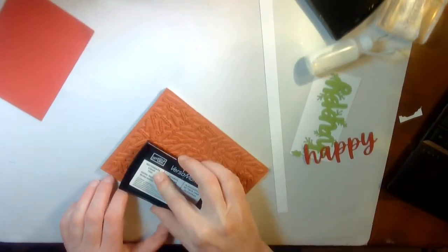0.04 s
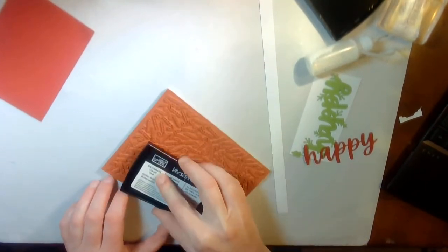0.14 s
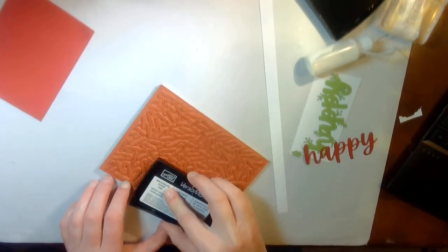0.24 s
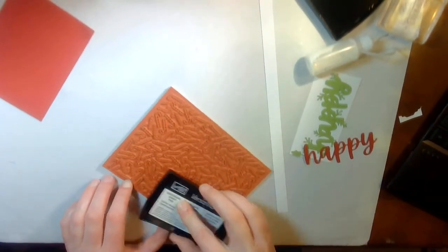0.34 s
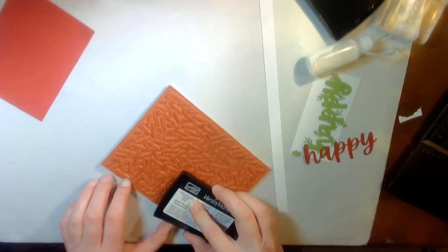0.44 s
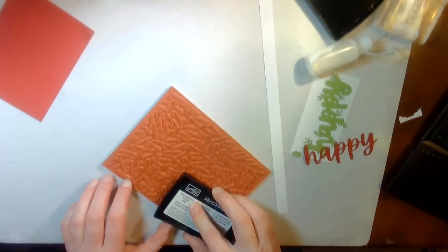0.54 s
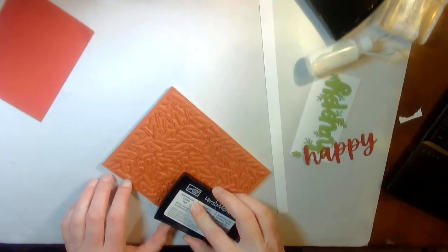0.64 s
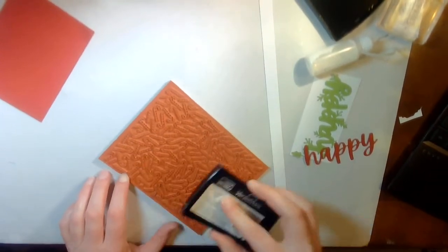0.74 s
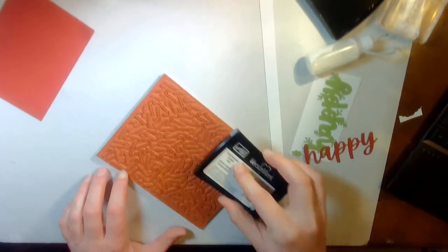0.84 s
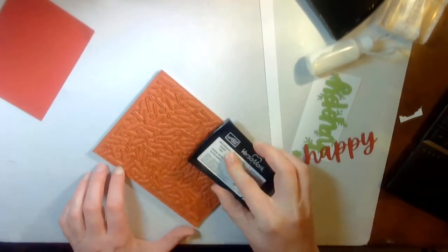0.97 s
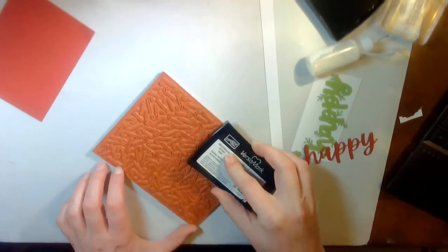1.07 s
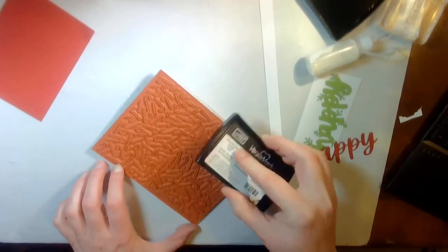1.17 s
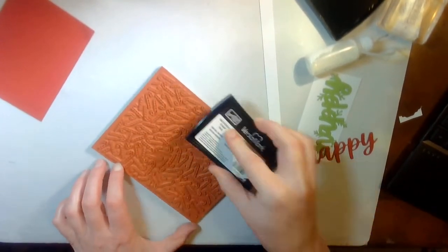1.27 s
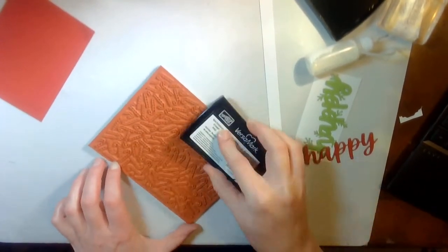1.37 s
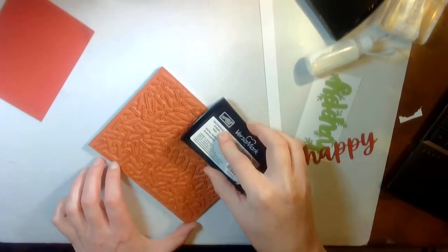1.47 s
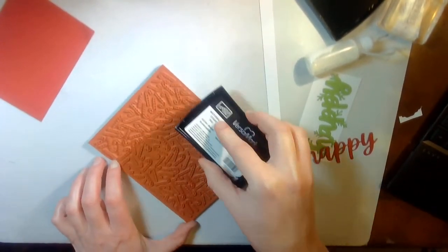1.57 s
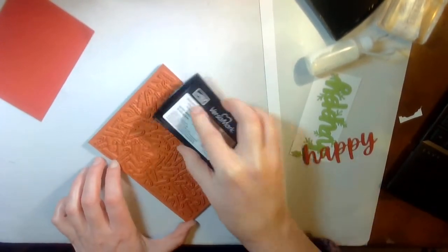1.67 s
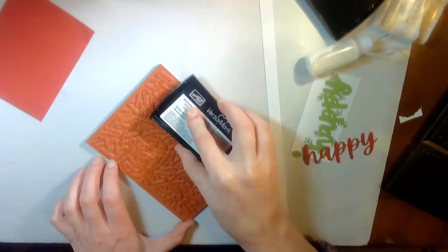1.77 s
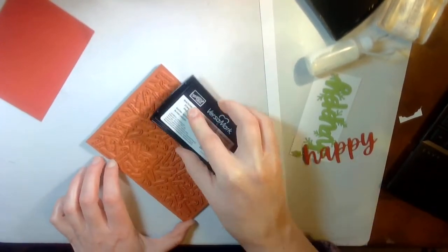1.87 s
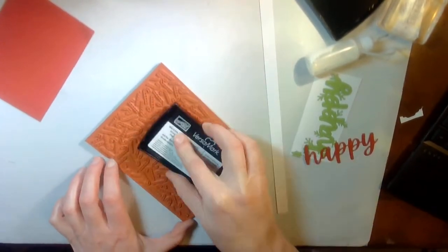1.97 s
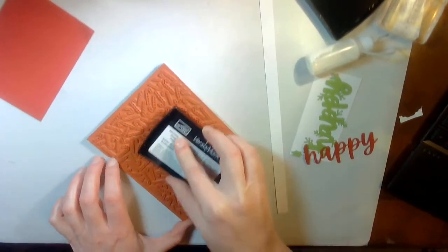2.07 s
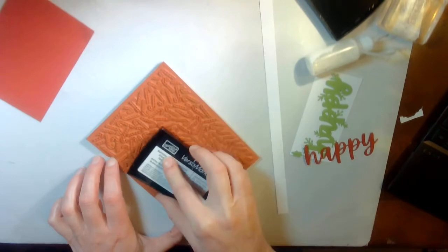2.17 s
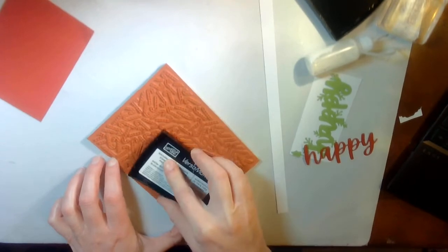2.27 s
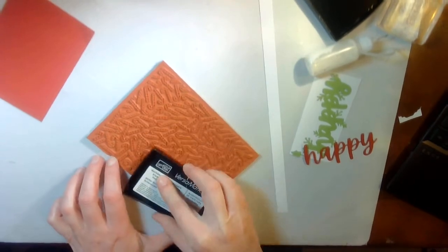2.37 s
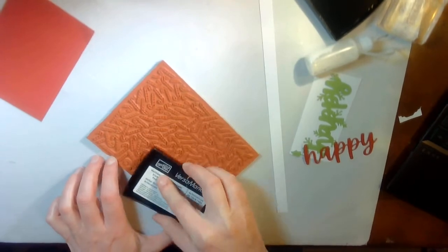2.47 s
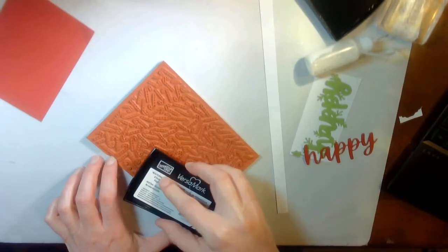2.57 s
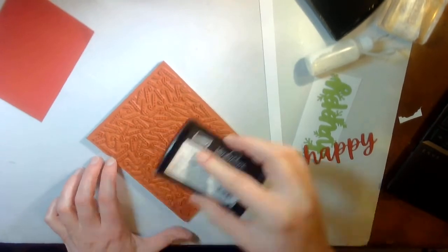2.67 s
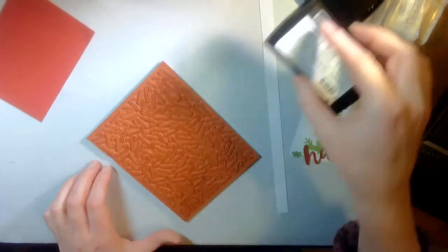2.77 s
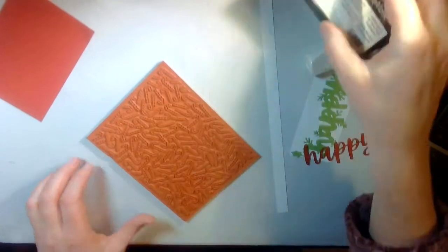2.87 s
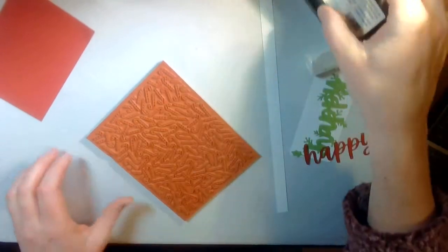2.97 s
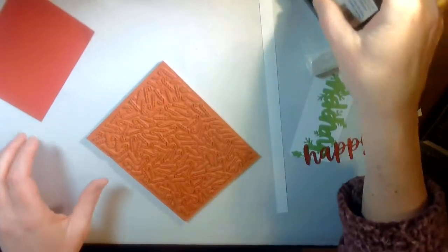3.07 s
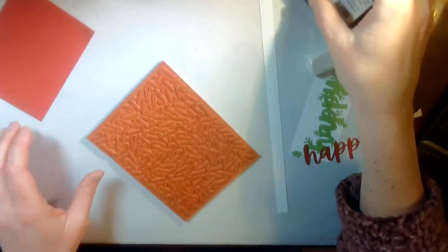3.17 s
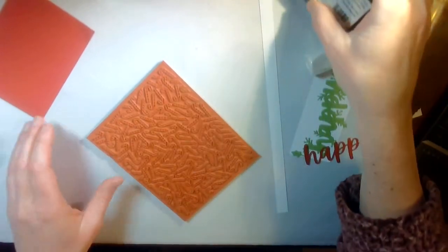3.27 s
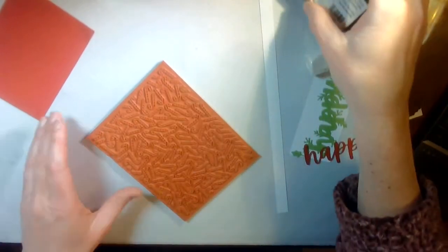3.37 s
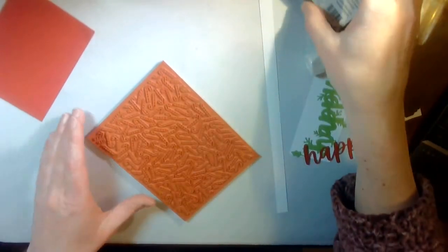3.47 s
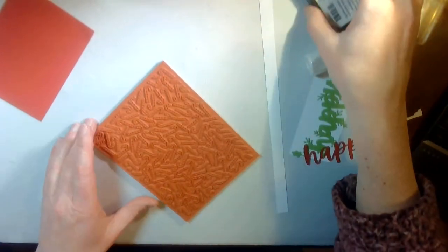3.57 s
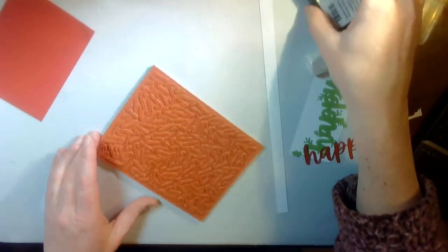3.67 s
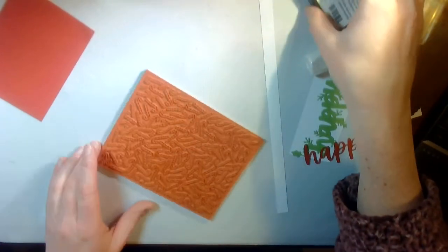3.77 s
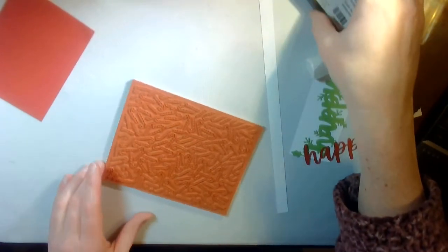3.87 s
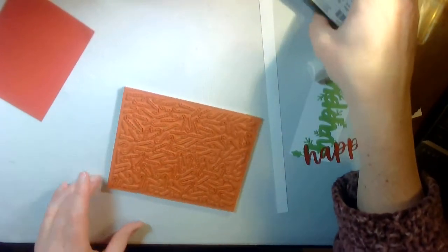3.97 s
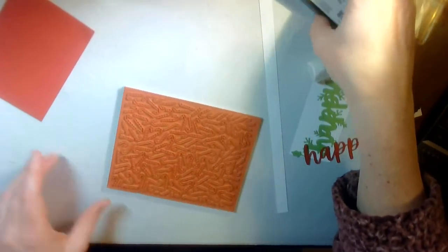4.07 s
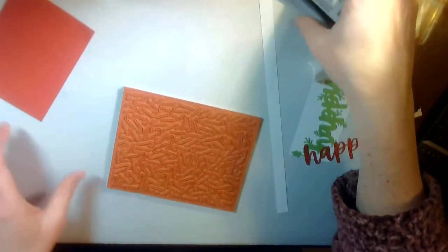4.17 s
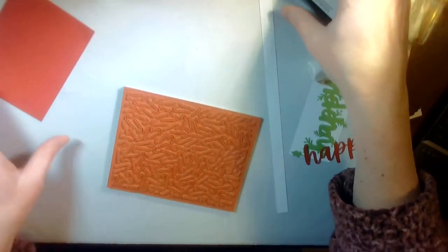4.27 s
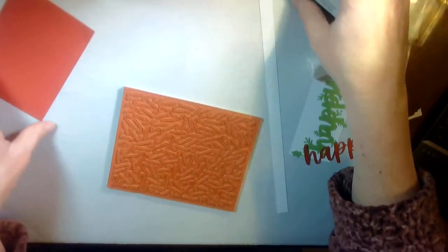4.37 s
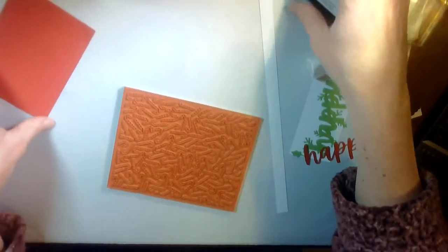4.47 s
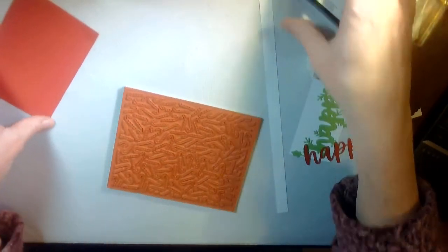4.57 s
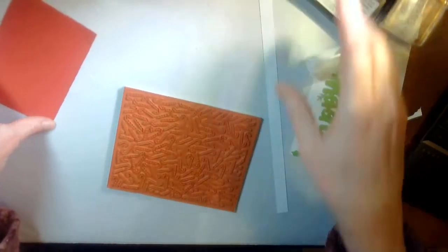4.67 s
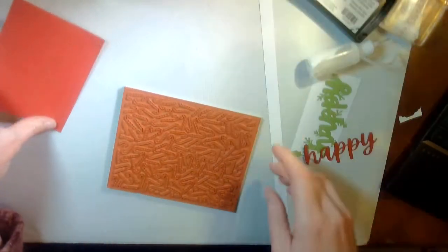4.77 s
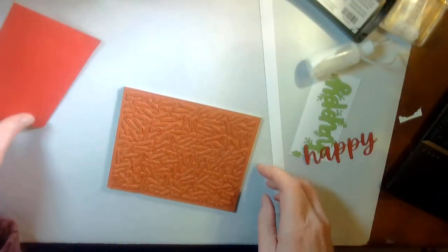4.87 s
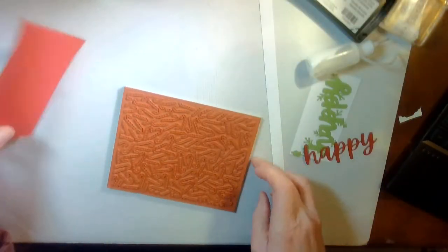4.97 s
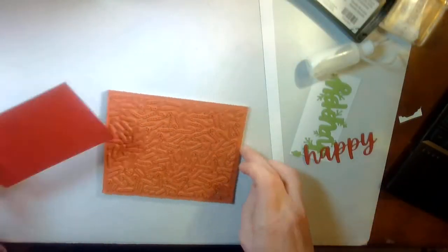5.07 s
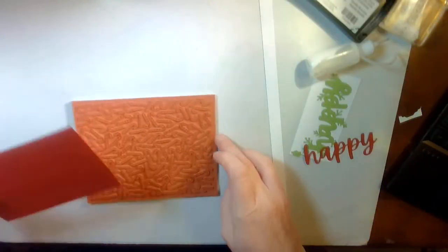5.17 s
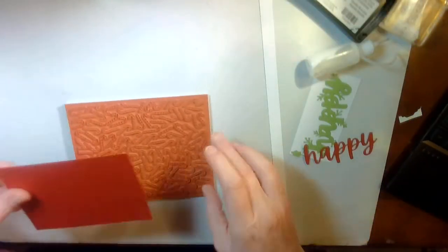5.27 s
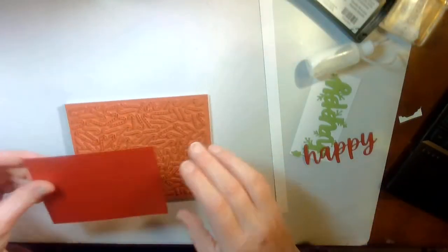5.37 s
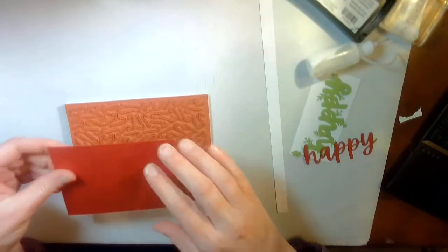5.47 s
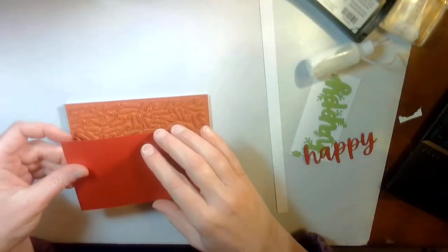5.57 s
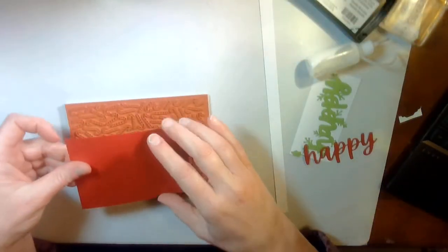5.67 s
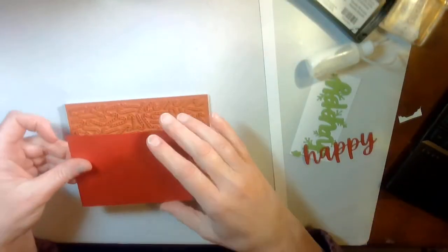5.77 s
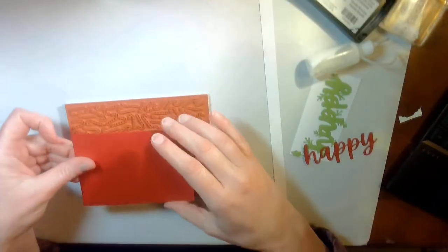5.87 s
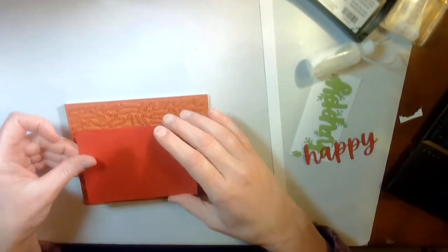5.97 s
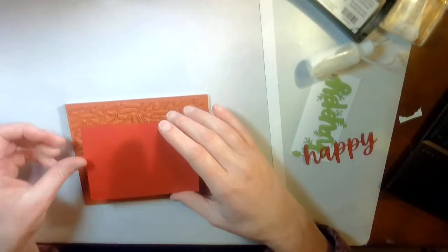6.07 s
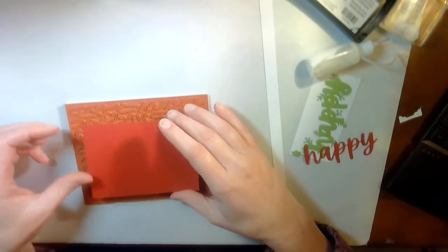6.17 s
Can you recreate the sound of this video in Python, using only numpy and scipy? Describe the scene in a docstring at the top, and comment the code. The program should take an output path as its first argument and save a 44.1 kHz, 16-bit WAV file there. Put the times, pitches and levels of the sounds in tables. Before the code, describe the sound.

A quiet small room with soft low room noise and very faint hum, heard from a microphone standing on the desk. From 0 to 2.5 seconds a plastic ink pad dabs a rubber stamp nine times, at about 0.0, 0.25, 0.45, 0.9, 1.3, 1.7, 2.0, 2.2 and 2.35. Each is a faint brush, a small click and a dull boomy thump, then a soft tacky peel; the last four are lighter. A muffled extra dab shakes at 1.2. Light sliding begins near 2.7. At 3.1 a dull knock, then a loud bright plastic clatter at 3.35 to 3.55, and a hard snap at 4.3. From 4.7 to 5.1 come dry scrapes and small ticks as the stamp is turned. At 5.55 and 5.75 a card brushes down with soft taps, sliding gently until the end.

```python
"""Over room noise and faint tones, an ink pad dabs a rubber stamp on a desk nine times: brush, click, thump, peel.
The pad then clatters down and its lid snaps shut; last, the stamp is turned and a card is slid onto it.
Pulses ring decaying modes of desk and microphone stand, noise bursts those of the plastic case;
grainy noise makes the brushes, peels, scrapes, slides and the dull shake of a light extra dab.
A small room and a microphone on the desk colour it."""
import sys
import numpy as np
from scipy import signal
from scipy.fft import rfft, irfft
from scipy.io import wavfile

SR = 44100
rng = np.random.default_rng(int(sys.argv[2]) if len(sys.argv) > 2 else 0)


def master(y):
    """Save y as 16-bit WAV."""
    cut = np.clip(np.atleast_2d(y).T, -1, 1)
    pcm = np.round(cut * 32767)  # scale
    wavfile.write(sys.argv[1], SR, pcm.astype(np.int16))


N = 274743
TIME = np.arange(N) / SR

# All db columns are relative levels, except in HUM_TONES.
# background noise spectrum: pitch_hz, density_db
FLOOR_SPECTRUM = [(13, 1.5), (22, -10.5), (64, 1.5), (83, -11.5), (152, -12), (194, -13.5), (236, -16),
                  (270, -20.5), (337, -19.5), (554, -23.5), (1970, -29), (2980, -32), (4630, -27.5),
                  (5310, -32.5), (16000, -35)]
# mains hum, fan and electronics: pitch_hz, rms_db
HUM_TONES = [(59.5, -57), (145.3, -67), (236.9, -70.5), (15482, -76)]
# hands and stamp sliding over the desk: time_s, friction_db
SLIDE_LEVELS = [(2.6, -73), (2.69, -57), (2.93, -68.5), (3.39, -83), (3.54, -58), (3.78, -56), (4.1, -65.5),
                (4.73, -63), (4.89, -53.5), (5.07, -52.5), (5.22, -57), (5.51, -93.5), (5.68, -56),
                (5.8, -87), (6.02, -55), (6.23, -57.5)]
# first row: dull shake of a light extra dab; others: fingers and card brushing pad, stamp and desk:
# middle_s, sigma_s, level_db, centre_hz, width_octaves
GRAINY_STROKES = [(1.231, 0.0061, -38, 500, 0.56), (3.14, 0.011, -48.5, 565, 4),
                  (4.294, 0.017, -49.5, 4000, 1), (4.488, 0.016, -55, 3830, 0.65),
                  (4.714, 0.016, -45.5, 5350, 2.1), (4.808, 0.014, -40.5, 3220, 0.69),
                  (4.833, 0.03, -45.5, 6200, 3.9), (4.88, 0.0092, -39, 186, 1.9),
                  (4.937, 0.014, -39.5, 600, 3.6), (4.976, 0.0058, -28.5, 680, 1.54),
                  (5.572, 0.037, -55, 4700, 0.48), (5.633, 0.025, -49, 1680, 1.2),
                  (5.767, .024, -41.5, 2010, 3.05)]
# pad rocks, clatters down, snaps shut; stamp is nudged: start_s, level_db, chatter_ms, hardness_hz, spot_hz
KNOCK_CONTACTS = [(0.4861, -9.5, 2.3, 4540, 1760), (0.7305, -35.5, 1.2, 7000, 4000),
                  (.803, -35, 0.65, 7000, 4830), (0.9411, -18, 1, 3580, 1350),
                  (1.221, -19, 6.3, 1700, 1010), (3.127, -5.5, 2.5, 300, 201),
                  (3.3582, -3, 4.9, 7635, 4450), (3.4037, 5.5, 1.6, 11100, 1970),
                  (3.406, 5.5, 3.8, 9100, 2960), (3.4825, -4, 3.6, 4150, 2700),
                  (3.527, -7, 4.4, 4650, 1070), (3.85, -27.5, 2.6, 2400, 875),
                  (4.105, -14, 1.44, 5400, 4500), (4.288, -22, 2.6, 4470, 1990),
                  (4.309, -20, 6.4, 4800, 2600), (4.3148, 8, 1.57, 1236, 696),
                  (4.317, 8.5, 7.9, 8500, 4360), (4.475, -37.5, 3.4, 4000, 1800),
                  (4.86, -23, 0.86, 5950, 3980), (4.9113, -12.5, 3.4, 7200, 1600),
                  (5.5435, -25.5, 6.8, 3060, 1010), (5.747, -18, 7.9, 1800, 1430)]
# pad on stamp: start_s, force_db, stand_shake_db, stand_shake_hz, lift_after_s, peel_db
DAB_CONTACTS = [(.0098, -8, 3, 510, .14, -52.5), (0.2381, -11, -3, 454, .078, -54),
                (0.4542, -2.5, 3, 387, 0.23, -48), (.908, -8, 0, 580, 0.19, -51.5),
                (1.3191, -2, -0.5, 290, 0.19, -52), (1.7038, -17.5, -10.5, 393, .186, -58),
                (1.978, -19, -2, 446, .132, -58.5), (2.1692, -24, -9, 423, 0.12, -57),
                (2.3557, -18.5, -2.5, 440, 0.18, -52.5)]
# desk top modes: pitch_hz, level_db, t60_s
DESK_MODES = [(38.8, -24.5, 0.59), (49.14, -20, 0.3), (56.8, -42.5, 0.87), (101, -20.5, 0.16),
              (118, -30.5, 0.4), (146.3, -31, 0.36), (195, -58, 0.47), (211.3, -34.5, 0.43),
              (293, -47.5, 0.12)]
# microphone stand modes, shaken through the desk: pitch_hz, level_db, t60_s
STAND_MODES = [(137, -30.5, 0.068), (216, -25, 0.038), (268.7, -30, 0.12), (301, -35.5, 0.097),
               (360.6, -22.5, 0.05), (449, -43, 0.11), (483, -26, 0.062), (537, -54, 0.074),
               (675, -37, 0.0664), (1006, -14.5, 0.014), (1192, -10.5, 0.028)]
# ink pad case modes: pitch_hz, level_db, t60_s
CASE_MODES = [(577, -38.5, 0.023), (746, -39.5, 0.075), (1057, -43, 0.014), (1360, -32.5, 0.021),
              (1640, -33.5, 0.032), (2024, -18.5, 0.0043), (2470, -29.5, 0.037), (2830, -28, 0.013),
              (3390, -37.5, 0.024), (3800, -27, 0.011), (4303, -25.5, 0.0092), (4663, -27, 0.015),
              (5080, -22, 0.0073), (5560, -28.5, 0.015), (6040, -27, 0.0089), (6950, -32.5, 0.016),
              (8400, -82, 0.00354), (12900, -27, .004)]
# room tail: pitch_hz, level_db, t60_s
ROOM_TAIL = [(100, -17.5, 1), (286, -4.5, 0.17), (664, -5.5, 0.19), (1500, -15, 0.29), (3000, -19.5, 0.28),
             (4950, -19, 0.28), (7960, -19, 0.4), (15500, -35, 0.073)]

FLOOR_RMS_DB = -53
SLIDE_DB, SLIDE_LOW_HZ, SLIDE_HIGH_HZ = -2, 3180, 5830
# felt brushes the rubber just before landing
BRUSH_LEAD_S, BRUSH_SIGMA_S, BRUSH_DB, BRUSH_LOW_HZ, BRUSH_HIGH_HZ = .002, 0.0049, -54.5, 1240, 5870
# tacky ink lets go: louder peels reach lower; PEEL_LOW_HZ holds at PEEL_REF_DB
PEEL_SIGMA_S, PEEL_REF_DB, PEEL_LOW_HZ, PEEL_DB_PER_OCTAVE, PEEL_HIGH_HZ = 0.023, -52.5, 2280, 19, 5940
# faint finger ticks; levels spread downward from TICK_MAX_DB
TICKS_PER_S, TICK_MAX_DB, TICK_SPREAD_DB = 0.94, -41, 6
TICK_CHATTER_MS, TICK_HARDNESS_HZ, TICK_SPOT_HZ = 1.0, 6500, 4300
# faint ring after the third dab
TING_S, TING_HZ, TING_DB, TING_T60_S = .487, 3320, -55.5, .4
TOUCH_SPREAD_DB = 1.5
KNOCK_LOW_SHARE = 0.62  # high-pass corner of a knock / its spot pitch
DAB_CHATTER_SHARE, DAB_HARDNESS_HZ = .8, 4630  # chatter length / push length
# firmer dabs push harder and shorter; PUSH_DB and PUSH_MS hold at 0 dB force
PUSH_DB, PUSH_DB_PER_FORCE_DB, PUSH_MS, PUSH_HALVING_DB = -1, 0.37, 2.9, 23.5
STAND_LAG_S = .011
CUTOFF_HZ = 16100


def from_db(db):
    """Decibels to gain."""
    return 10 ** (np.asarray(db) / 20)


def rms_one(x):
    """Scale to rms 1."""
    return x / np.sqrt(np.mean(x ** 2) + 1e-20)


def at_hz(rows, hz, axis=1):
    """Read one table column on a log-frequency axis."""
    rows = np.array(rows)
    return np.interp(np.log(np.maximum(hz, 1)), np.log(rows[:, 0]), rows[:, axis])


def cut(x, hz, kind, order=2):
    """Butterworth low-, high- or band-pass."""
    corner_hz = np.clip(hz, 10, .45 * SR)
    return signal.sosfilt(signal.butter(order, corner_hz, kind, fs=SR, output="sos"), x)


def resonate(x, hz, q):
    """Band-pass of gain 1 at its centre."""
    return signal.lfilter(*signal.iirpeak(hz, q, fs=SR), x)


def add(track, s, sound):
    """Mix a sound into a track from time s on."""
    start = int(np.clip(round(s * SR), 0, N - 1))
    track[start:start + len(sound)] += sound[:N - start]


def background(wander_rad=0.054):
    """Steady shaped noise plus faint tones with slightly wavering phase."""
    spectrum = from_db(at_hz(FLOOR_SPECTRUM, np.fft.rfftfreq(N, 1 / SR)))
    noise = irfft(rfft(rng.standard_normal(N)) * spectrum, N)
    tones = np.zeros(N)
    for hz, rms_db in HUM_TONES:
        waver = wander_rad * rms_one(cut(rng.standard_normal(N), 30, "low"))
        tones += np.sqrt(2) * from_db(rms_db) * np.sin(2 * np.pi * hz * TIME + waver)
    return from_db(FLOOR_RMS_DB) * rms_one(noise) + tones


def friction(size, low_hz, high_hz, grain_db, grains_per_s=650, fizz_db=-17):
    """Rubbing noise that catches on tiny bumps; rms 1."""
    bumps = np.interp(TIME[:size] * grains_per_s, np.arange(size), rng.standard_normal(size))
    rough = cut(rng.standard_normal(size) * from_db(grain_db * bumps), low_hz, "high")
    body = cut(rough, high_hz, "low", order=4)
    fizz = from_db(fizz_db) * cut(rough, 3 * high_hz, "low")
    return rms_one(body + fizz)


def stroke(s, sigma_s, low_hz, high_hz, grain_db):
    """Grainy noise that swells and fades as a Gaussian around time s."""
    t = TIME[:SR // 2] - .25
    swell = friction(len(t), low_hz, high_hz, grain_db) * np.exp(-.5 * (t / sigma_s) ** 2)
    out = np.zeros(N)
    start_s = s + t[0]
    add(out, start_s, swell[max(0, round(-start_s * SR)):])  # drop what precedes time 0
    return out


def sliding(grain_db=4.5):
    """Hands and stamp moving over the desk: a thin friction hiss of changing level."""
    s, db = np.transpose(SLIDE_LEVELS)
    level = from_db(SLIDE_DB + np.interp(TIME, s, db)) * (TIME > s[0])
    return level * friction(N, SLIDE_LOW_HZ, SLIDE_HIGH_HZ, grain_db)


def shake_and_scrapes(grain_db=5.0):
    """Short grainy noise: a light dab's dull shake, then scrapes, dull from a fingertip, bright from card edge."""
    out = np.zeros(N)
    for s, sigma_s, db, hz, octaves in GRAINY_STROKES:
        reach = 2 ** (octaves / 2)
        out += from_db(db) * stroke(s, sigma_s, hz / reach, hz * reach, grain_db)
    return out


def peels(grain_db=4.5):
    """Friction of the felt brushing before each dab and of the pad lifting off inky rubber after it."""
    out = np.zeros(N)
    for s, *_, lift_s, db in DAB_CONTACTS:
        low_hz = PEEL_LOW_HZ * 2 ** ((PEEL_REF_DB - db) / PEEL_DB_PER_OCTAVE)
        brush = stroke(s - BRUSH_LEAD_S, BRUSH_SIGMA_S, BRUSH_LOW_HZ, BRUSH_HIGH_HZ, grain_db)
        peel = stroke(s + lift_s, PEEL_SIGMA_S, low_hz, PEEL_HIGH_HZ, grain_db)
        out += from_db(BRUSH_DB) * brush + from_db(db) * peel
    return out


def ring(force, modes, spread_db=0, touches_per_s=20):
    """Each mode answers a unit click with a dying cosine; its strength drifts at random over time."""
    out = np.zeros(N)
    for hz, db, t60_s in modes:
        radius = from_db(-60 / (t60_s * SR))
        angle = 2 * np.pi * hz / SR
        gains = from_db(spread_db * rng.standard_normal(256))
        share = np.interp(TIME * touches_per_s, np.arange(256), gains)
        numerator = [1, -radius * np.cos(angle)]
        denominator = [1, -2 * radius * np.cos(angle), radius ** 2]
        out += from_db(db) * signal.lfilter(numerator, denominator, force * share + 1e-18)
    return out


def ting():
    """One faint mode struck by a unit impulse."""
    return ring(signal.unit_impulse(N, round(TING_S * SR)), [(TING_HZ, TING_DB, TING_T60_S)])


def finger_ticks(count=16):
    """Tiny finger knocks on the case at uneven intervals, as knock rows."""
    draws = rng.random((count, 2))
    times = np.cumsum(.5 + draws[:, 0]) / TICKS_PER_S
    levels = TICK_MAX_DB - TICK_SPREAD_DB * draws[:, 1]
    return [(s, db, TICK_CHATTER_MS, TICK_HARDNESS_HZ, TICK_SPOT_HZ)
            for s, db in zip(times, levels) if s < TIME[-1]]


def push_length_ms(force_db):
    """Landing time of the felt, shorter for firmer dabs."""
    return PUSH_MS * 2 ** (-force_db / PUSH_HALVING_DB)


def push(ms):
    """Soft contact: half sine of unit area."""
    phase = np.arange(SR // 50) / (ms * SR / 1000)
    pulse = np.sin(np.pi * phase) * (phase < 1)
    return pulse / pulse.sum()


def chatter(ms, size=2048, count=1):
    """Hard contact: brief noise burst with a random lumpy spectrum; unit energy."""
    window = np.exp(-(np.arange(size) / (ms * SR / 1000)) ** 4)
    burst = rng.standard_normal(size) * window
    for _ in range(count):
        flattened = irfft(np.exp(1j * np.angle(rfft(burst))))
        burst = flattened * window
    return burst / np.linalg.norm(burst)


def case_clicks(dab_low_hz=250, dab_spot_hz=4400, spot_db=1, spot_q=3.3,
                crack_db=3, crack_top_hz=5900, edge_db=-12):
    """Contacts crack and ring the plastic case; harder ones reach higher, around the struck spot's pitch."""
    force = np.zeros(N)
    dabs = [(s, db, DAB_CHATTER_SHARE * push_length_ms(db), DAB_HARDNESS_HZ, dab_spot_hz, dab_low_hz)
            for s, db, *_ in DAB_CONTACTS]
    knocks = [(*row, KNOCK_LOW_SHARE * row[-1]) for row in list(KNOCK_CONTACTS) + finger_ticks()]
    for s, db, ms, hardness_hz, spot_hz, low_hz in dabs + knocks:
        contact = cut(cut(chatter(ms), hardness_hz, "low"), low_hz, "high")
        spot = from_db(spot_db) * resonate(contact, spot_hz, spot_q)
        add(force, s, from_db(db) * (contact + spot))
    crack = from_db(crack_db) * cut(force, crack_top_hz, "low", order=4)
    edge = from_db(edge_db) * force
    return crack + edge + ring(force, CASE_MODES, spread_db=TOUCH_SPREAD_DB)


def desk_thumps(stand_push_ms=1.0, shake_q=2.68, knock_db=-24, knock_push_ms=1.0, knock_low_hz=150):
    """Felt pushes ring the desk and, after a lag, the stand; hard contacts barely move them."""
    on_desk, on_stand, jolts = np.zeros((3, N))
    for s, force_db, shake_db, shake_hz, *_ in DAB_CONTACTS:
        push_db = PUSH_DB + PUSH_DB_PER_FORCE_DB * force_db
        add(on_desk, s, from_db(push_db) * push(push_length_ms(force_db)))
        shake = resonate(push(stand_push_ms), shake_hz, shake_q)
        add(on_stand, s + STAND_LAG_S, -from_db(shake_db) * shake)
    for s, db, *_ in KNOCK_CONTACTS:
        add(jolts, s, from_db(db + knock_db) * push(knock_push_ms))
    jolts = cut(jolts, knock_low_hz, "high")
    desk = ring(on_desk + jolts, DESK_MODES)
    stand = ring(on_stand + jolts, STAND_MODES, spread_db=TOUCH_SPREAD_DB)
    return desk + stand


def room(x):
    """Quick echoes from desk and shelves plus a tail, as noise bands decaying at their own rates."""
    early_db, early_t60_s, first_echo_s = -14, .1, .003
    t = TIME[:SR * 3 // 4]
    onset = np.clip(t / first_echo_s - 1, 0, 1)
    edges_hz = np.geomspace(70, 17000, 12)
    response = np.zeros(len(t))
    for low, high in zip(edges_hz, edges_hz[1:]):
        hz = np.sqrt(low * high)
        band_share = np.sqrt(2 * (high - low) / SR)  # energy in proportion to bandwidth
        tail = (at_hz(ROOM_TAIL, hz), at_hz(ROOM_TAIL, hz, axis=2))
        for db, t60_s in [(early_db, early_t60_s), tail]:
            decay = from_db(-60 * t / t60_s) * onset
            echoes = decay * cut(rng.standard_normal(len(t)), np.array([low, high]), "band")
            response += from_db(db) * band_share * echoes / np.linalg.norm(echoes)
    return x + signal.fftconvolve(x, response)[:N]


def microphone(x, peak_hz=4740, width_hz=900, peak_db=5.5):
    """Capsule with a strong presence resonance, added to the direct signal."""
    return x + from_db(peak_db) * resonate(x, peak_hz, peak_hz / width_hz)


def scene(rub_db=-5.5, click_db=0.0):
    """Handling sounds through room and microphone, over the background."""
    grainy = from_db(rub_db) * (sliding() + shake_and_scrapes() + peels())
    clicks = from_db(click_db) * case_clicks()
    handling = grainy + ting() + clicks + desk_thumps()
    return (background() + microphone(room(handling)))[None]


def record(dry):
    """Soft overload of the loudest snaps, then a steep top cut."""
    rounded = .68 * np.tanh(dry / .68)
    return signal.sosfilt(signal.ellip(10, .1, 70, CUTOFF_HZ, fs=SR, output="sos"), rounded)


dry = scene()
out = record(dry)
master(out)
```